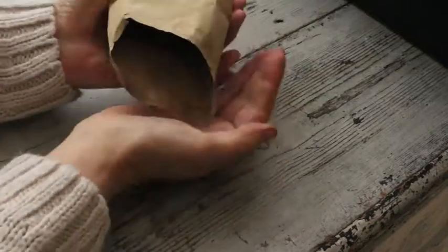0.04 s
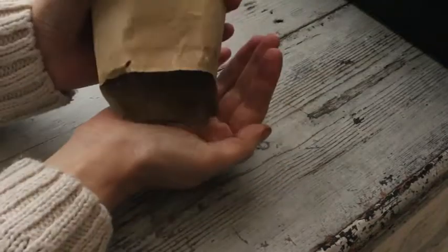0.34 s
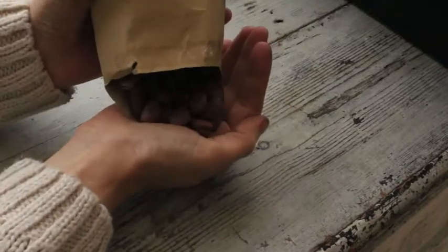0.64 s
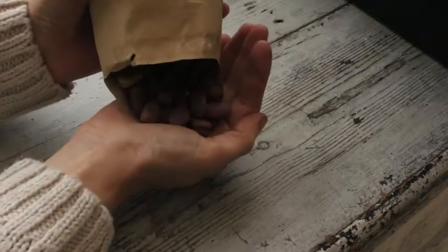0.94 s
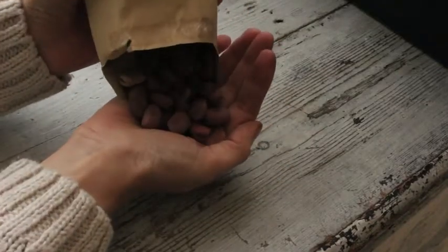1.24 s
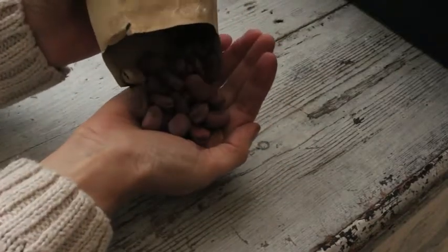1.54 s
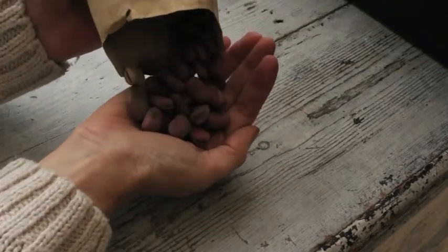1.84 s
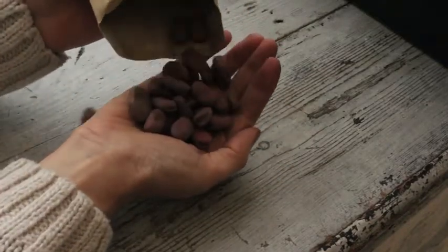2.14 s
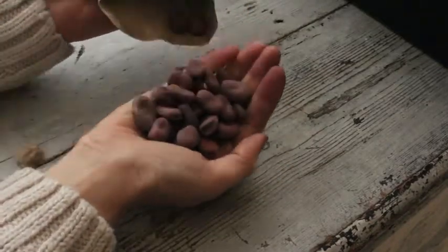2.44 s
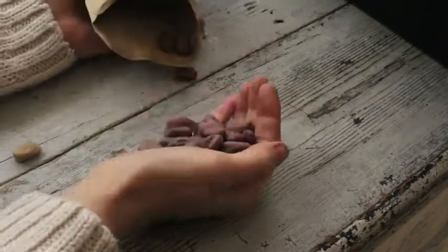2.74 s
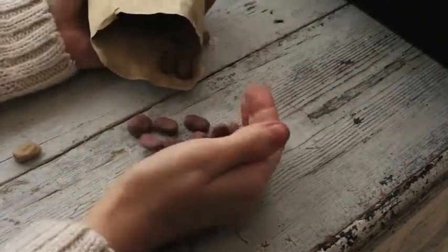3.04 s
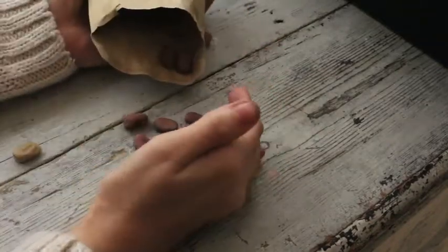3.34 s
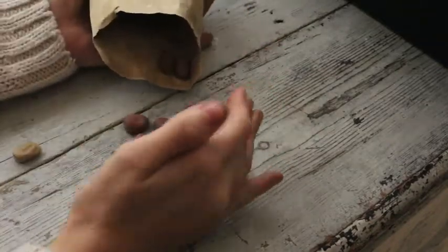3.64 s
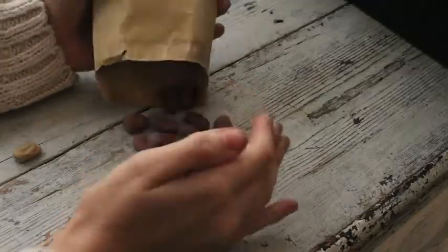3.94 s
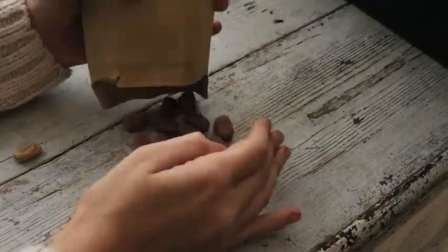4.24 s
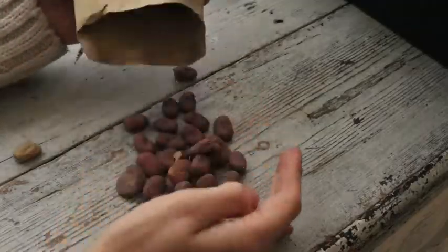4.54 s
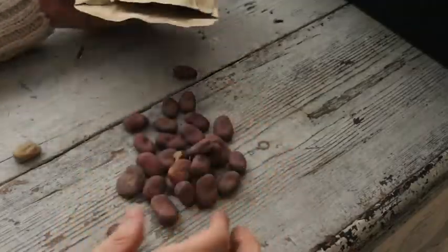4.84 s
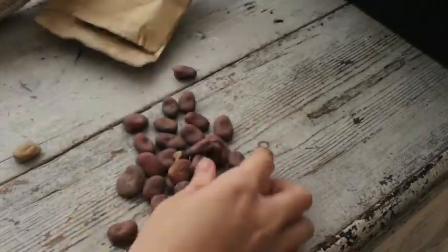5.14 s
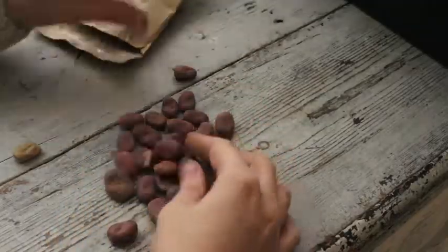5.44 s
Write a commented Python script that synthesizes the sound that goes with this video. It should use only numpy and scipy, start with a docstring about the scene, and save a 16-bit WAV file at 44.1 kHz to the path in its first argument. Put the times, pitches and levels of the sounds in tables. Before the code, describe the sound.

A hand softly bumps a wooden table at the start. From about 0.3 seconds, dried beans scrape out of a paper packet into a palm, with paper snaps and crinkles until 0.8. Quieter sliding and small crackles continue to about 2 seconds, with a very faint low rumble near 1.7. At 2.2 a stray bean drops and bounces with sharp clacks that make the planks ring briefly, followed by a soft hand bump at 2.6. From 2.8 the handful spills onto the wood, clicking, rolling and rattling, thinning out by 3.8. A few last beans fall between 4 and 4.3. The empty packet rustles faintly and is tapped from 4.5, then is laid down with a sharp snap around 5.15. From 5.3 fingers stir the heap with light clicks and soft bumps. Everything sounds close, in a small, quiet room with a slight echo.

```python
"""Dried beans scrape out of a paper packet into a cupped hand, close by in a small, quiet room.
A hand bumps the plank table, the paper snaps and crinkles, and a faint low rumble comes and goes.
After two seconds a stray bean drops and bounces, each clack making the planks ring. Then the handful
is tipped out: beans click together and rattle over the wood. The last beans follow, the empty packet
rubs in the hand and is laid down, and fingers stir the heap."""
import sys
import numpy as np
from scipy import signal
from scipy.fft import rfft, irfft, next_fast_len
from scipy.io import wavfile

SR = 44100
rng = np.random.default_rng(int(sys.argv[2]) if len(sys.argv) > 2 else 0)


def generate_wav(signal):
    """Clip the signal to [-1, 1] and save it as 16-bit WAV at the path in sys.argv[1]."""
    frames = np.transpose(np.atleast_2d(signal))
    scaled = np.clip(frames, -1, 1) * 32767
    pcm = np.round(scaled).astype(np.int16)
    wavfile.write(sys.argv[1], SR, pcm)


N = 251497
TIME = np.arange(N) / SR
HIT_TIME = TIME[:SR // 8]   # the time axis of one short hit

# Levels in the tables are relative: the functions add their own gain on top.
# each tilt or shake sets beans sliding on the paper:
# t/s, rise/s, hold/s, time to fade by 20 dB/s, scrape level/dB, hiss compared with scrape/dB
SHAKES = [(-0.014, 0.034, 0.11, 3.8, -55, -4.5), (0.2, 0.016, .06, 1.4, -48.5, -6.5),
          (0.262, 0.075, .2, 0.1341, -29, -9), (0.394, 0.05, .13, 0.11, -29, -2.5),
          (0.979, 0.057, 0.069, .24, -42, -6.5), (1.271, 0.032, 0.05, 0.36, -47.5, -5.5),
          (1.365, 0.057, 0.015, 0.24, -45, -4.5), (1.571, 0.12, 0.023, 0.17, -44.5, -2.5),
          (1.899, 0.012, 0.076, 1.6, -50.5, 0), (3.815, 0.063, .14, 0.12, -44, -7.5)]
# the paper wall rings lower as beans load its lip, then a little higher: t/s, f/Hz
WALL_PITCH = [(0.32, 2260), (0.45, 1910), (0.62, 1451), (1.1, 1610)]
# a hand bumps the table: t/s, level/dB, f/Hz
HAND_BUMPS = [(0.001, -31, 487), (0.041, -17.5, 279.5), (2.612, -20, 220), (5.278, -31, 476),
              (5.396, -26.5, 220)]
# the paper buckles: t/s, level/dB, snap f/Hz
CRINKLES = [(0.2904, -27.5, 3540), (0.6276, -25.5, 2090), (0.837, -51, 3584), (1.13, -40.5, 2960),
            (1.448, -38, 2210), (1.929, -38, 2720), (2.0759, -34.5, 3500), (5.3374, -33, 3170)]
# the packet is tapped: t/s, snap level/dB, snap f/Hz, pop level/dB, pop f/Hz
PACKET_TAPS = [(0.658, -40, 1280, -31, 800), (0.7492, -34, 1360, -30.5, 560), (0.7791, -48, 1140, -82, 706),
               (4.4811, -35.5, 1720, -56, 1300), (4.555, -29.5, 1480, -30, 940),
               (4.7341, -33, 1580, -37, 636), (5.1512, -14.5, 2100, -25, 944)]
# a low rumble swells and sinks: t/s, level/dB
SWELL_LEVELS = [(1.45, -72), (1.65, -51.5), (1.85, -59.5), (2.0, -65)]
# bean meets bean: t/s, level/dB, f/Hz
BEAN_CLICKS = [(2.148, -22.5, 4000), (2.2897, -20.5, 7800), (2.8692, -27.5, 7700), (2.9321, -23.5, 5300),
               (3.001, -23, 5140), (3.007, -17, 5350), (3.1318, -25.5, 7030), (3.1658, -20.5, 4330),
               (3.181, -27, 6500), (3.3674, -34, 5740), (3.3842, -33, 4140), (3.6242, -32, 4220),
               (3.6825, -24, 4100), (3.7301, -44, 6000), (4.2794, -32, 4740), (5.444, -34.5, 3470),
               (5.5072, -39, 3950), (5.5694, -36, 3700), (5.6396, -33.5, 3900)]
# beans strike the table: t/s, clack level/dB, f/Hz, hardness (boosts the crack)/dB, chatter/ratio
BEAN_HITS = [(2.211, -6, 2590, -14, 4.6), (2.2263, -11.5, 2800, -14, 1.1), (2.2339, -8.5, 1490, -0.5, 1.4),
             (2.242, -12.5, 1180, -2, 2.4), (2.2897, -16.5, 1970, -1, 0.86), (2.3047, -19, 1700, -1, 3.4),
             (2.3195, -21.5, 2160, 4.5, 3.1), (2.3588, -19, 1390, -26, 0.67),
             (2.4055, -15.5, 1490, -26, 2.4), (2.4505, -10, 1420, -19, 0.95), (2.475, -30, 1520, 2.5, 2.4),
             (2.5447, -17.5, 1616, -66, 1.7), (2.8039, -6, 1830, -11, 1.2), (2.827, -13, 1990, -14, 0.79),
             (2.8694, -15, 1880, -8.5, 0.31), (2.8923, -13.5, 1810, -27, 1.5), (2.9301, -13, 1330, -3, 3.8),
             (2.9593, -10, 1460, -5.5, 1.4), (3.0015, -20, 1820, 2.5, .9), (3.0122, -11.5, 1340, -27, 2),
             (3.046, -13.5, 1810, -3, 1.5), (3.0612, -10, 1720, -5.5, 1.2), (3.1005, -14.5, 2100, -16, 2.3),
             (3.1311, -22, 1810, -19, 1.5), (3.181, -14, 1600, -10, 1.6), (3.2442, -15.5, 1250, -8, 1.8),
             (3.278, -21.5, 1180, -14, 1), (3.4012, -29.5, 1690, -11.5, 0.77),
             (3.4861, -21.5, 1370, -11.5, 1.4), (3.5358, -16.5, 1500, -12.5, 1.6),
             (3.5731, -17.5, 1460, -37, 2.3), (3.616, -19.5, 1810, -30, 1), (3.624, -19, 1200, -16, 1.8),
             (3.682, -19, 1580, -9, 1.4), (3.707, -21, 1280, -7, 2.3), (3.7301, -15.5, 1910, -15, 1.7),
             (3.8304, -20, 1480, -9.5, 1.3), (3.8802, -29.5, 1400, -18, 1.1),
             (4.0298, -18.5, 1780, -16, 1.1), (4.0682, -25.5, 1750, -26, 1.9),
             (4.1563, -31.5, 2390, -3, 1.2), (4.198, -27, 1860, -5, 3), (4.2152, -26, 1810, -27, 2.8),
             (4.2795, -22.5, 1550, -16, 1.4), (4.3082, -33.5, 1720, -6, 1.1), (4.3265, -27, 1330, -15, 1.1),
             (5.3369, -20.5, 2100, -3.5, 3.4), (5.3866, -21, 1830, -3.5, 1.7), (5.409, -43, 1760, -18, 1.3)]
# each batch of beans rolls, then comes to rest:
# t/s, rise/s, hold/s, time to fade by 20 dB/s, rattle level/dB, rumble level/dB, friction level/dB
SPILLS = [(2.26, 0.023, 0.053, 0.4, -28, -42.5, -47.5), (2.817, .13, 0.2, 0.34, -27.5, -39, -41),
          (3.172, 0.015, 0.016, 0.46, -50, -38.5, -39), (3.476, 0.043, 0.22, 0.39, -36, -49, -54),
          (4.022, .01, .03, 0.38, -39, -48.5, -53), (4.252, 0.025, 0.024, 0.24, -50, -48, -60.5),
          (5.249, 0.13, 0.028, 0.74, -37, -45, -45.5)]
# the stray bean skids with a thin chirp: t/s, level/dB, f/Hz
SKID_CHIRP = [(2.368, -31.5, 12700)]
# the empty packet rubs in the hand: t/s, level/dB
RUB_LEVELS = [(4.45, -79), (4.584, -59), (4.72, -45), (4.878, -44.5), (5.08, -45), (5.17, -53), (5.32, -42)]
# the table's own notes: f/Hz, level when hit by the stray bean/dB, level when hit under the heap/dB
PLANK_NOTES = [(224, 0.5, -6), (264.4, -24, 6), (376.6, -5, -1), (490, 4, -27), (525, -32, 0),
               (643.4, 8, -3.5), (781, 6.5, 5), (844, -39, 5), (923, -26, -0.5), (982, 3, -4),
               (1053, -19, -5.5), (1280, -1, -9), (1712, -3, -3), (1810, -7, 0.5), (2050, -15, -26),
               (2230, -8, -18), (2500, -22, -19), (2720, -6, -15), (2943, -3, -8), (3245, -0.5, -14),
               (3500, -17, -12)]

# tone of the room's background noise: f/Hz, level/dB
AIR_TONE = [(20, -20), (36, 3), (56, -2), (85, -5), (130, -2), (280, -7.5), (450, -16.5), (700, -21),
            (1200, -18), (2500, -19), (10000, -29.5), (16000, -33)]
# tone of beans scraping paper: f/Hz, level/dB
SCRAPE_TONE = [(600, -29), (900, -9), (1220, 0.5), (1400, -3.5), (1680, 0), (2150, -2.5), (2600, -3.5),
               (3200, -3), (4300, -9), (7000, -21.5), (11000, -24), (16000, -36)]
# tone of the hollow packet drumming: f/Hz, level/dB
HOLLOW_TONE = [(70, -59), (130, -15.5), (210, -5.5), (260, -2), (335, -9), (480, 0), (750, 1.5),
               (1000, -3.5), (1600, -10), (4000, -48)]
# tone of sliding husks: f/Hz, level/dB
HISS_TONE = [(2000, 0), (4300, 2.5), (6000, 4.5), (9000, -1), (11500, -9.5), (15500, -28)]
# tone of beans landing in the palm: f/Hz, level/dB
PALM_TONE = [(80, -28), (200, 1), (250, -0.5), (340, -20), (800, -35)]
# tone of the room's echoes: f/Hz, level/dB
ECHO_TONE = [(60, 8), (250, -4.5), (550, 0), (1000, -1.5), (3500, 3), (8000, -2), (16000, -5.5)]
# tone of the low swell: f/Hz, level/dB
SWELL_TONE = [(20, -23), (40, -13), (56, 14), (72, -17), (120, -40), (300, -80)]
# tone of rolling beans: f/Hz, level/dB
RATTLE_TONE = [(400, -34), (650, 1.5), (900, 1.5), (1400, 5), (1800, -2), (2400, 2.5), (3200, -9),
               (4500, -8.5), (8000, -32)]
# tone of the wood under them: f/Hz, level/dB
RUMBLE_TONE = [(70, -43), (125, -10), (180, -11), (250, -5.5), (360, -6.5), (530, -4.5), (700, -17),
               (1200, -44)]
# tone of rubbed paper: f/Hz, level/dB
RUB_TONE = [(180, -15), (300, -7.5), (425, -11.5), (462, -11.5), (946, -8), (1250, -10), (1460, -4),
            (2280, -9), (3290, -7), (9390, -16), (16000, -32)]
# how long the echoes last (t60 is the time to fade by 60 dB): f/Hz, t60/s
ECHO_T60 = [(200, 0.47), (500, 0.45), (1500, 0.44), (4000, 0.08), (12000, 0.73)]
# stereo width of the sounds, as side (left-right difference) over mid (shared part): f/Hz, level/dB
WIDTH = [(60, -20), (200, -31), (600, -14), (1400, -11.5), (3000, -8.5), (6000, -6.5), (10000, -4),
         (15000, -2)]
# stereo width of the background noise, side over mid: f/Hz, level/dB
AIR_WIDTH = [(60, -9), (130, -5.5), (290, 0.5), (640, 10.5), (1410, 4.5), (3100, 3.5), (6820, 3),
             (15000, 0)]


def from_db(db):
    """Turn decibels into a number to multiply by."""
    return np.exp(np.asarray(db) * (np.log(10) / 20))


def rms_one(x):
    """Scale a signal so that its average strength (rms) is 1."""
    return x / np.sqrt(np.mean(x ** 2) + 1e-20)


def level_curve(rows):
    """Join (time, level) points into a gain curve that fades quickly at both ends."""
    s, db = np.transpose(rows)
    fade = np.interp(TIME, [s[0] - .01, s[0], s[-1], s[-1] + .02], [0, 1, 1, 0])
    return fade * from_db(np.interp(TIME, s, db))


def at_hz(points, hz):
    """Read a table between its rows, with every octave equally wide."""
    f, value = np.transpose(points)
    return np.interp(np.log(np.maximum(hz, 1)), np.log(f), value)


def band(x, low_hz, high_hz, order=3):
    """Keep the sound between two frequencies."""
    edges = np.clip([low_hz, high_hz], 10, .45 * SR)
    return signal.sosfilt(signal.butter(order, edges, "band", fs=SR, output="sos"), x)


def resonance(x, hz, width_hz):
    """Ring at one pitch; the narrower the width, the longer the ring."""
    r = np.exp(-np.pi * width_hz / SR)
    feedback = [1, -2 * r * np.cos(2 * np.pi * hz / SR), r * r]
    return signal.lfilter(np.array([1, 0, -1]) * (1 - r * r) / 2, feedback, x + 1e-18)


def spread(pair, tone, width=WIDTH):
    """Turn two unrelated signals into stereo with a given tone and width; rms 1."""
    size = next_fast_len(pair.shape[1])
    hz = np.arange(size // 2 + 1) * SR / size
    mid, side = rfft(pair, size) * from_db(at_hz(tone, hz))
    left_right = mid + from_db(at_hz(width, hz)) * side * [[1], [-1]]
    return rms_one(irfft(left_right, size)[:, :pair.shape[1]])


def movement(s, rise_s, hold_s, fade_s):
    """Beans gather speed evenly, keep going, then friction stops them."""
    age = TIME - s
    return np.clip(age / rise_s, 0, 1) * from_db(-20 * np.maximum(age - rise_s - hold_s, 0) / fade_s)


def together(gains):
    """Unrelated movements add in power, so sum their squares."""
    return np.sqrt(np.sum(np.square(gains), axis=0))


def grains(tone, per_s, size_db, smooth, clump_db):
    """Tiny uneven contacts over smooth friction, in 12 ms clumps as beans catch and slip; rms 1."""
    contacts = rng.random(N) < per_s / SR
    sizes = from_db(size_db * np.minimum(rng.exponential(1, N), 3))
    clump_times = np.arange(0, TIME[-1], .012)
    clumps = from_db(clump_db * np.interp(TIME, clump_times, rng.uniform(-1, 1, len(clump_times))))
    ticks = rms_one(contacts * sizes * rng.choice([-1, 1], (2, N)))
    friction = smooth * rng.standard_normal((2, N))
    return spread(clumps * (ticks + friction), tone)


def flicks(per_s, middle_hz, octaves, size_db, width_share):
    """Scattered ticks on six pitches, each tick with its own strength and place; rms 1."""
    out = np.zeros((2, N))
    pitches = middle_hz * 2 ** (octaves * np.linspace(-1, 1, 6))
    for hz in pitches:
        when, size, pan = rng.random((int(per_s * TIME[-1] / len(pitches)), 3)).T
        clicks = np.zeros((2, N))
        clicks[:, (when * N).astype(int)] = from_db(size_db * size) * np.array([pan, 1 - pan])
        out += resonance(clicks, hz, width_share * hz)
    return rms_one(band(out, pitches[0] / 2, pitches[-1] * 1.15, order=2))


def burst(low_hz, high_hz, t60, chatter, width):
    """One contact in stereo: a click, then noisy chatter that dies away in t60 seconds."""
    white = rng.standard_normal((2, len(HIT_TIME)))
    rebound = np.minimum(HIT_TIME / .001, 1) ** 2
    drive = np.vstack([HIT_TIME == 0, white * rebound * from_db(-60 * HIT_TIME / t60)])
    click, tail, side = band(drive + 1e-18 * white[0], low_hz, high_hz)
    mid = rms_one(rms_one(click) + chatter * rms_one(tail))
    stereo = mid + width * rms_one(side) * [[1], [-1]]
    return stereo * np.sqrt(.004 / HIT_TIME[-1])   # about the energy of 4 ms at rms 1


def add(out, s, sound):
    """Mix a sound in at s seconds."""
    start = max(round(s * SR), 0)
    out[:, start:start + sound.shape[1]] += sound[:, :N - start]


def room_air(level_db):
    """The steady, soft noise of a still room."""
    return from_db(level_db) * spread(rng.standard_normal((2, N)), AIR_TONE, AIR_WIDTH)


def sliding(scrape_db, wall_db, hollow_db, hiss_db, palm_db, crinkle_db):
    """Beans slip along the paper, which drums and crinkles, and patter into the palm."""
    moving = np.array([movement(*row[:4]) for row in SHAKES])
    db, brightness = np.transpose(SHAKES)[4:, :, None]
    scrape = together(from_db(db) * moving)
    hiss = together(from_db(db + brightness) * moving)
    drum, patter = scrape ** .76, scrape ** 1.53   # only a fast pour is heard in the palm
    out = from_db(scrape_db) * scrape * grains(SCRAPE_TONE, 2500, size_db=3.5, smooth=.54, clump_db=4)
    out += from_db(wall_db) * scrape * wall_ring(half_width_hz=360)
    out += from_db(hollow_db) * drum * grains(HOLLOW_TONE, 1200, size_db=6.5, smooth=1, clump_db=5.5)
    out += from_db(hiss_db) * hiss * grains(HISS_TONE, 2600, size_db=-1, smooth=.42, clump_db=1.5)
    out += from_db(palm_db) * patter * spread(rng.standard_normal((2, N)), PALM_TONE)
    crinkles = flicks(per_s=70, middle_hz=4300, octaves=1.2, size_db=13, width_share=.34)
    return out + from_db(crinkle_db) * hiss * crinkles


def wall_ring(half_width_hz):
    """The scraped paper wall rings: a band of noise around a gliding pitch; rms 1."""
    mid, side = band(rng.standard_normal((2, N)), 10, half_width_hz, order=2)
    pitch = np.interp(TIME, *np.transpose(WALL_PITCH))
    glide = np.sin(2 * np.pi * np.cumsum(pitch) / SR)
    return rms_one((mid + .1 * side * [[1], [-1]]) * glide)


def hand_bumps(level_db):
    """A soft hand only wakes the low notes of the table."""
    out = np.zeros((2, N))
    for s, db, hz in HAND_BUMPS:
        note = burst(hz / 1.28, hz * 1.36, t60=.053, chatter=1, width=.033)
        thud = from_db(-6.5) * burst(80, 580, t60=.022, chatter=11, width=.1)
        add(out, s, from_db(db + level_db) * (note + thud))
    return out


def room_echo(x, level_db, first_echo_s):
    """Sound bounces off nearby walls, each octave dying away at its own speed."""
    t = TIME[:SR // 2]
    white = rng.standard_normal((2, len(t)))
    edges = np.geomspace(60, 18000, 9)
    tail = np.zeros_like(white)
    for low, high in zip(edges, edges[1:]):
        t60 = at_hz(ECHO_T60, np.sqrt(low * high))
        tail += band(white * from_db(-60 * t / t60), low, high, order=1)
    fade_in = np.clip(t / first_echo_s - 1, 0, 1)
    tail = spread(tail, ECHO_TONE) * fade_in / np.sqrt(len(t))
    return from_db(level_db) * signal.fftconvolve(x.mean(axis=0)[None], tail, axes=1)[:, :N]


def packet_snaps(buckle_db, crackle_db, snap_db, pop_db):
    """Buckling paper snaps and crackles; a tapped packet snaps and gives a hollow pop."""
    out = np.zeros((2, N))
    for s, db, hz in CRINKLES:
        buckle = burst(hz / np.sqrt(2), hz * np.sqrt(2), t60=.02, chatter=1.5, width=.28)
        crackle = burst(4400, 10600, t60=.039, chatter=2.4, width=.63)
        add(out, s, from_db(db + buckle_db) * buckle + from_db(db + crackle_db) * crackle)
    for s, db, hz, pop_level, pop_hz in PACKET_TAPS:
        reach = 1.22 + 3 * from_db(db)   # a harder tap covers more frequencies
        snap = burst(hz / reach, hz * reach, t60=.017, chatter=1.3, width=.28)
        pop = burst(pop_hz / 2 ** .25, pop_hz * 2 ** .25, t60=.025, chatter=.8, width=.15)
        add(out, s, from_db(db + snap_db) * snap + from_db(pop_level + pop_db) * pop)
    return out


def low_swell():
    """A faint, very deep rumble rises and sinks under the quiet slide."""
    return level_curve(SWELL_LEVELS) * spread(rng.standard_normal((2, N)), SWELL_TONE)


def bean_clicks(level_db, ring_t60, chirp_db):
    """Two hard beans meet and ring very briefly; a skidding one chirps."""
    out = np.zeros((2, N))
    for s, db, hz in BEAN_CLICKS:
        ring = burst(hz / 1.18, hz * 1.175, ring_t60, chatter=.76, width=.27)
        tick = from_db(-9) * burst(4000, 8400, ring_t60, chatter=2.6, width=.43)
        add(out, s, from_db(db + level_db) * (ring + tick))
    for s, db, hz in SKID_CHIRP:
        chirp = burst(hz / 1.1, hz * 1.16, t60=.037, chatter=3, width=.92)
        add(out, s, from_db(db + chirp_db) * chirp)
    return out


def bean_hits(clack_db, knock_db, crack_db, tick_db, clack_t60, knock_t60):
    """A bean lands: it clacks, the wood knocks, the shell cracks and the husk ticks."""
    out = np.zeros((2, N))
    for s, db, hz, hardness, chatter in BEAN_HITS:
        knock, crack, tick = .97 * db, db + hardness, .78 * db + .31 * hardness
        t60 = clack_t60 * (.5 + .5 * chatter)   # a glancing bean chatters longer
        add(out, s, from_db(db + clack_db) * burst(hz / 1.475, hz * 1.48, t60, chatter, width=.27))
        add(out, s, from_db(knock + knock_db) * burst(261, 1320, knock_t60, chatter, width=.096))
        add(out, s, from_db(crack + crack_db) * burst(1440, 4230, t60, chatter, width=.37))
        add(out, s, from_db(tick + tick_db) * burst(3260, 9400, t60=.057, chatter=1, width=.7))
    return out


def table_ring(blows, heap_start_s, stray_db, heap_db, leg_damping_hz):
    """The planks ring on; how loud each note is depends on where they are struck."""
    on_heap, force = TIME > heap_start_s, blows.mean(axis=0)
    lowest_hz = PLANK_NOTES[0][0]
    out = np.zeros(N)
    for hz, at_stray, at_heap in PLANK_NOTES:
        gain = np.where(on_heap, from_db(at_heap + heap_db), from_db(at_stray + stray_db))
        leg_loss = leg_damping_hz * (lowest_hz / hz) ** 2   # the legs cut the low notes short
        out += resonance(force * gain, hz, width_hz=14.3 + .015 * hz + leg_loss)
    return out


def rolling(rattle_db, rumble_db, friction_db, flick_db):
    """Lopsided beans wobble over the grain of the wood, rubbing and flicking against each other."""
    moving = np.array([movement(*row[:4]) for row in SPILLS])
    levels_db = np.transpose(SPILLS)[4:, :, None]
    rattle, rumble, friction = [together(from_db(db) * moving) for db in levels_db]
    taps = from_db(rattle_db) * rattle * grains(RATTLE_TONE, 600, size_db=2, smooth=.64, clump_db=7.5)
    wood = from_db(rumble_db) * rumble * grains(RUMBLE_TONE, 400, size_db=4, smooth=.92, clump_db=2)
    husks = from_db(friction_db) * friction * grains(HISS_TONE, 500, size_db=-2, smooth=1, clump_db=1.5)
    ticks = flicks(per_s=55, middle_hz=6500, octaves=.67, size_db=11, width_share=.12)
    return taps + wood + husks + from_db(flick_db) * friction * ticks


def packet_rub(level_db):
    """The empty packet rustles as its paper rubs in the hand."""
    rustle = grains(RUB_TONE, per_s=4000, size_db=2, smooth=1.06, clump_db=2)
    return from_db(level_db) * level_curve(RUB_LEVELS) * rustle


def scene():
    """Mix the packet, hands, beans and table, and place them in the room."""
    paper = sliding(scrape_db=-1, wall_db=-8.5, hollow_db=-16.5, hiss_db=-1.5,
                    palm_db=-9, crinkle_db=-9.5)
    bumps = hand_bumps(level_db=-7)
    paper += packet_snaps(buckle_db=-7.5, crackle_db=-7.5, snap_db=-6.5, pop_db=-5)
    clicks = bean_clicks(level_db=-7, ring_t60=.037, chirp_db=-5.5)
    beans = bean_hits(clack_db=-11, knock_db=-17, crack_db=-7.5, tick_db=-24.5,
                      clack_t60=.019, knock_t60=.032)
    beans += rolling(rattle_db=-5, rumble_db=-2, friction_db=-3.5, flick_db=-5)
    wood = table_ring(beans, heap_start_s=2.78, stray_db=4, heap_db=3, leg_damping_hz=43.4)
    near = paper + bumps + clicks + beans + wood + packet_rub(level_db=.5)
    echo = room_echo(near, level_db=-7, first_echo_s=.0047)
    return near + echo + room_air(level_db=-53) + low_swell()


def record(dry):
    """Cut away the treble above 16000 Hz with a steep filter."""
    return signal.sosfiltfilt(signal.ellip(10, .1, 70, 16000, fs=SR, output="sos"), dry)


dry = scene()
out = record(dry)
generate_wav(out)
```